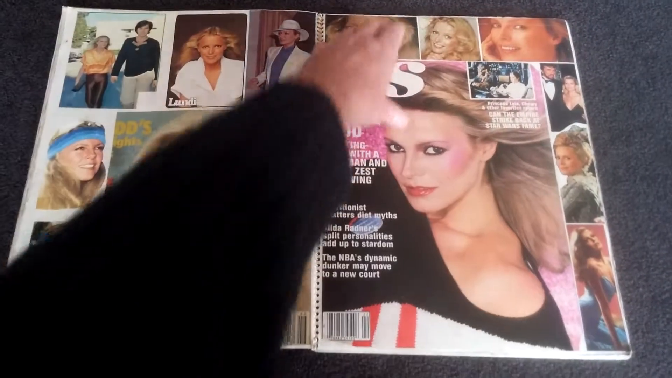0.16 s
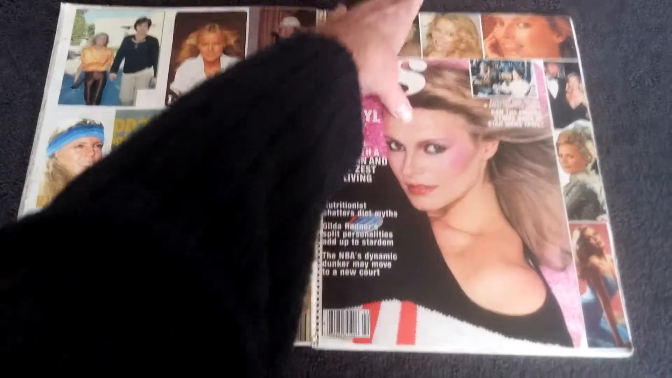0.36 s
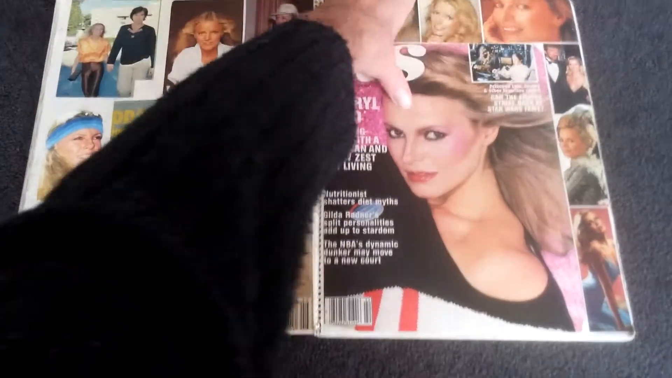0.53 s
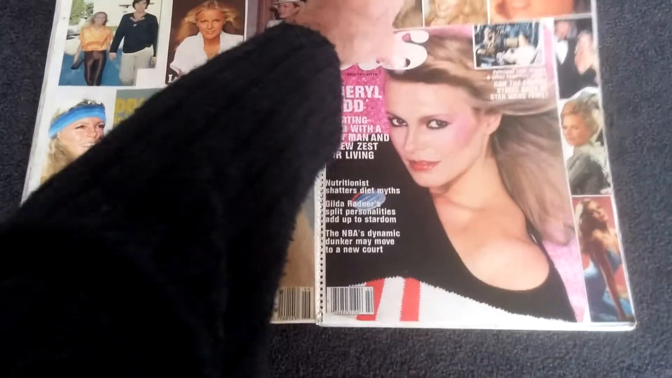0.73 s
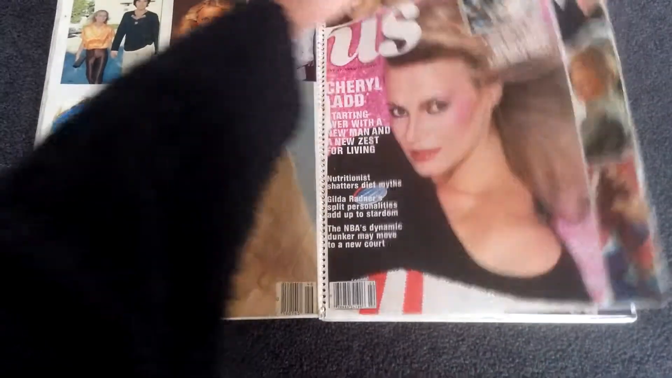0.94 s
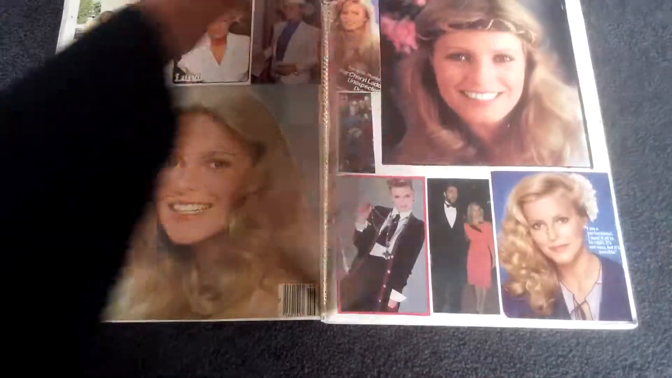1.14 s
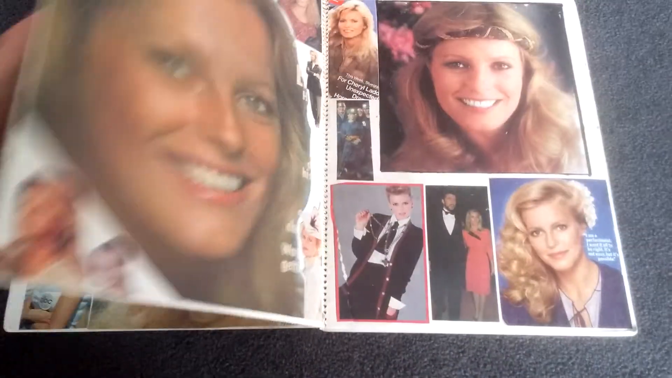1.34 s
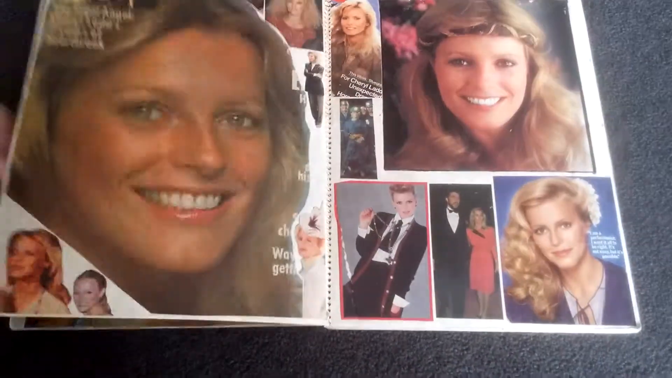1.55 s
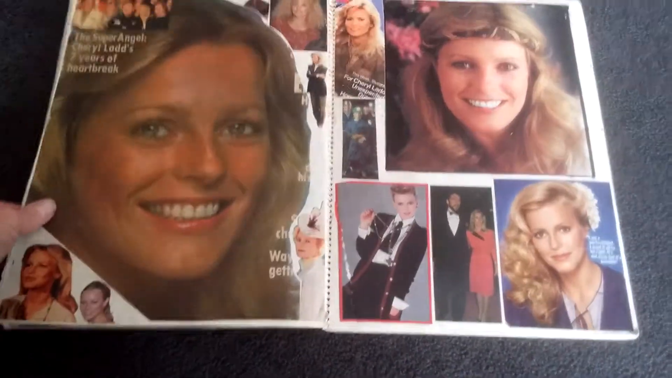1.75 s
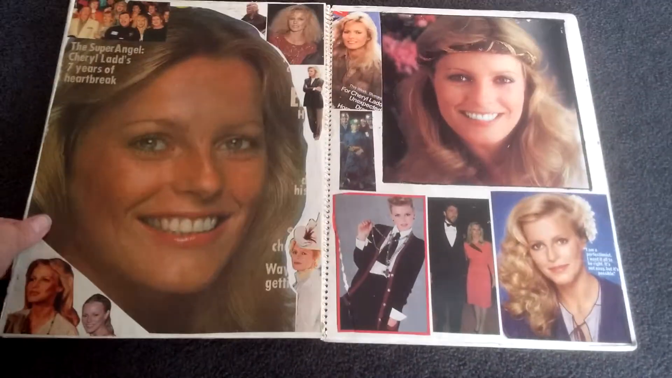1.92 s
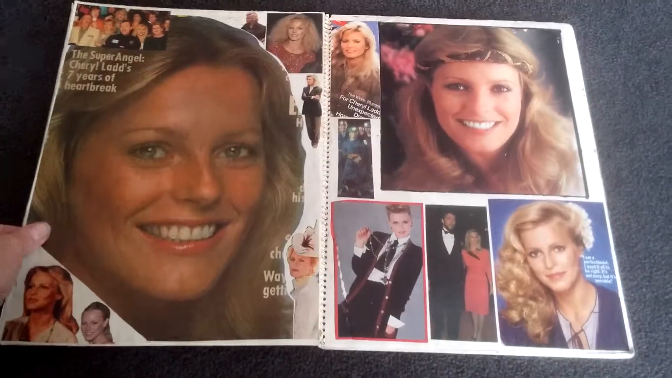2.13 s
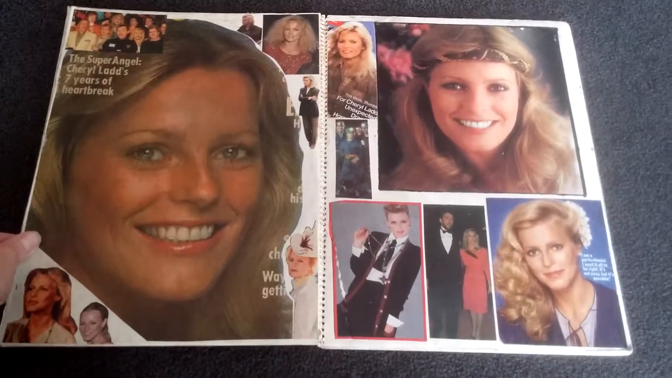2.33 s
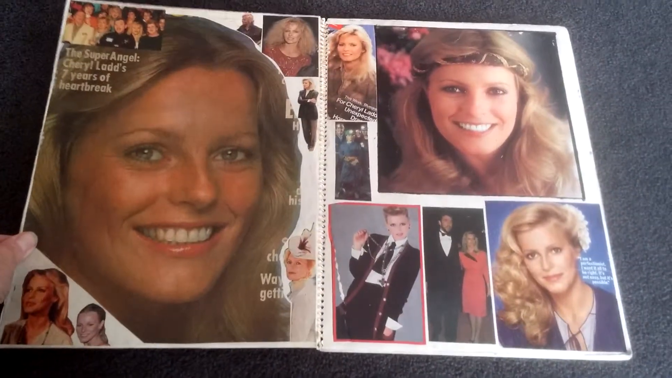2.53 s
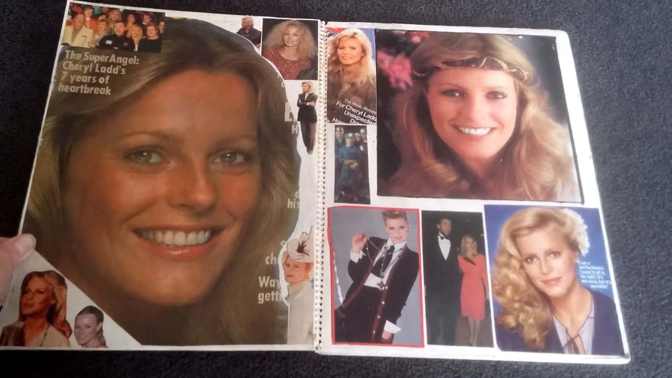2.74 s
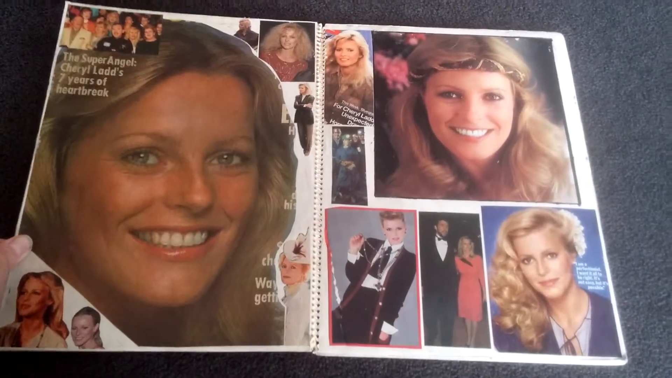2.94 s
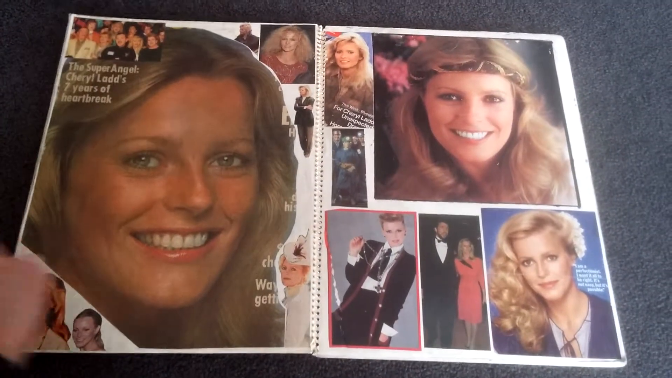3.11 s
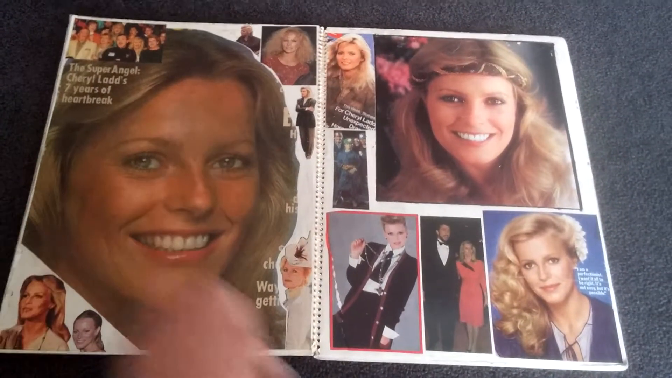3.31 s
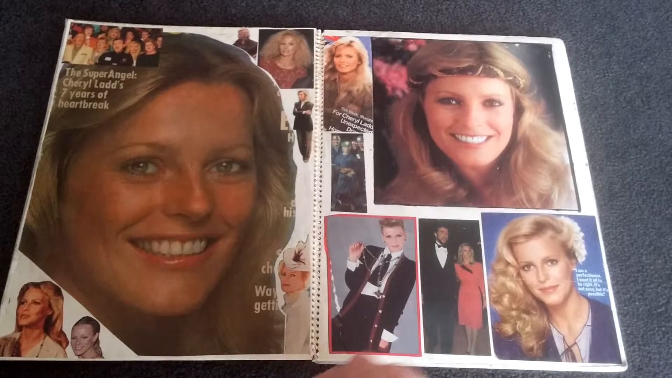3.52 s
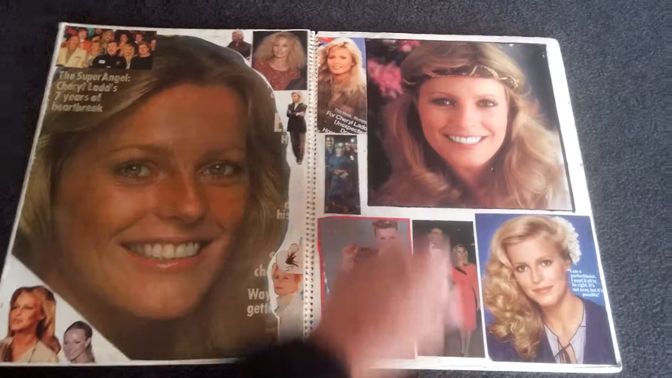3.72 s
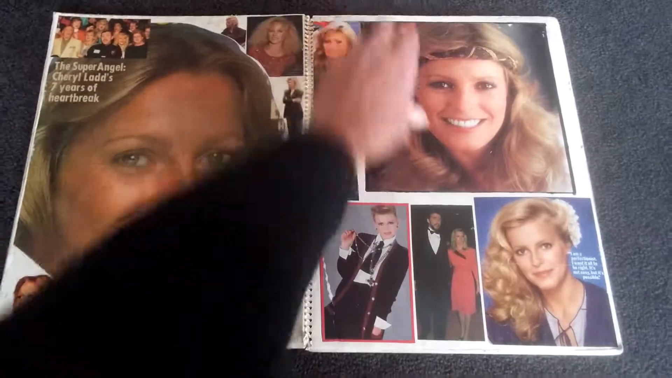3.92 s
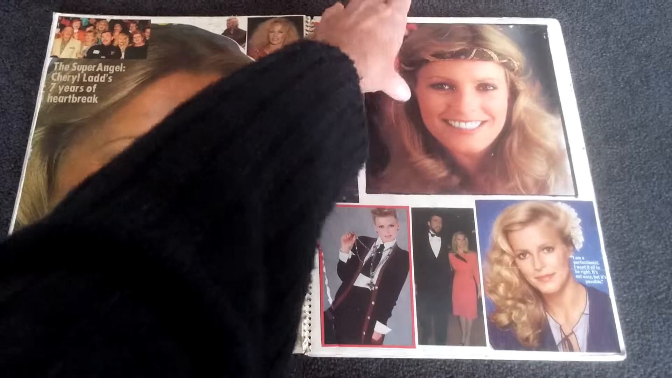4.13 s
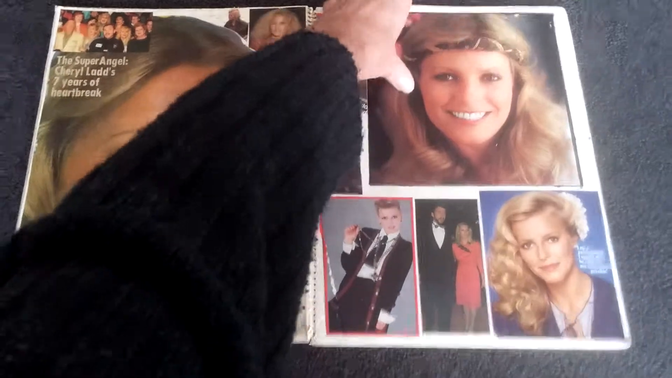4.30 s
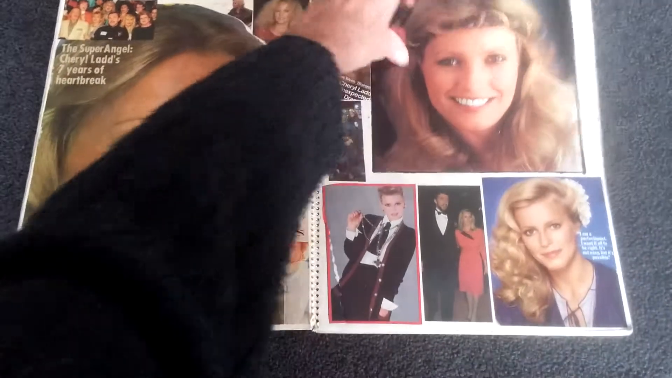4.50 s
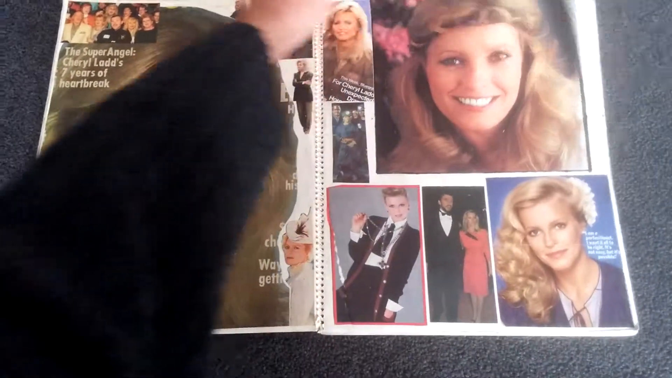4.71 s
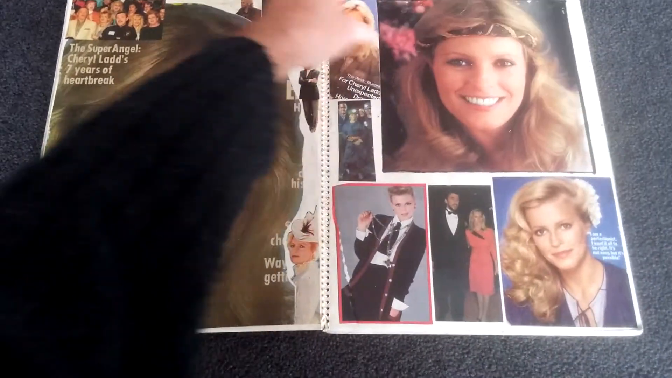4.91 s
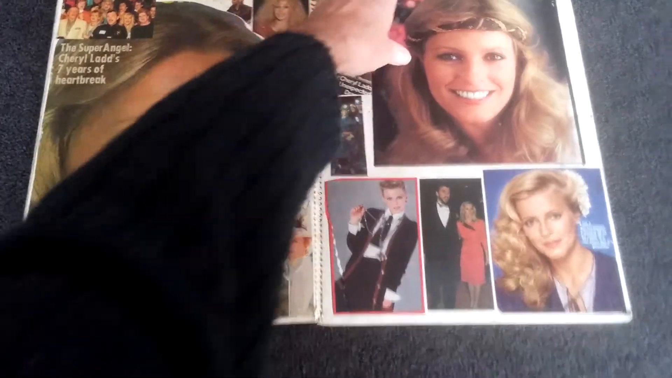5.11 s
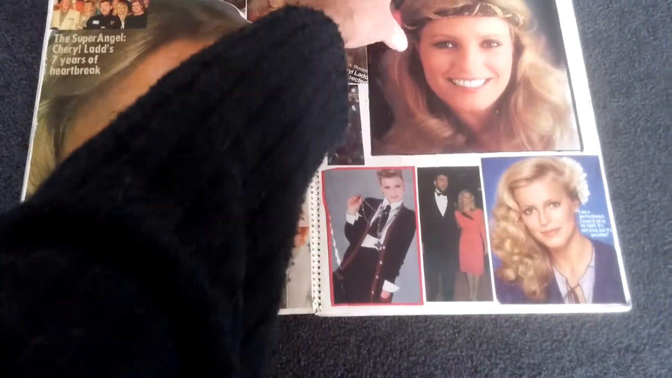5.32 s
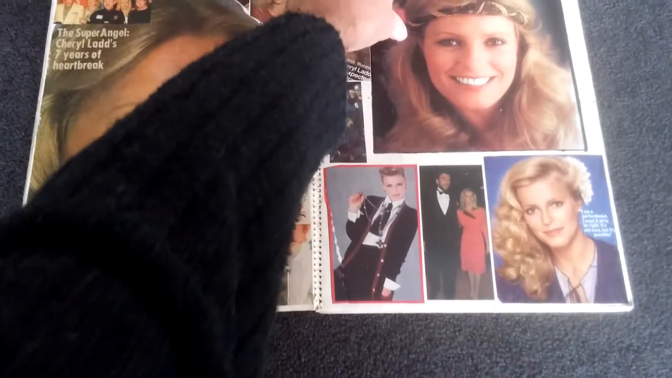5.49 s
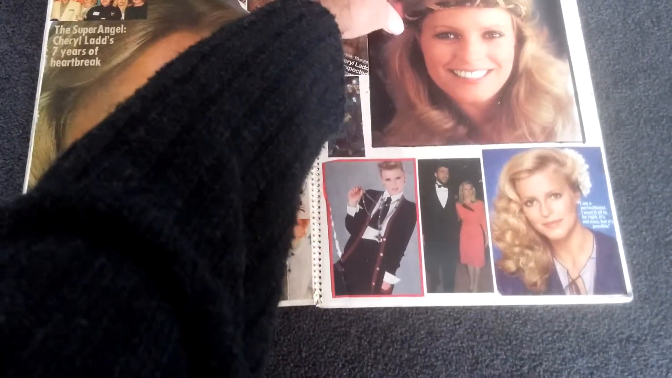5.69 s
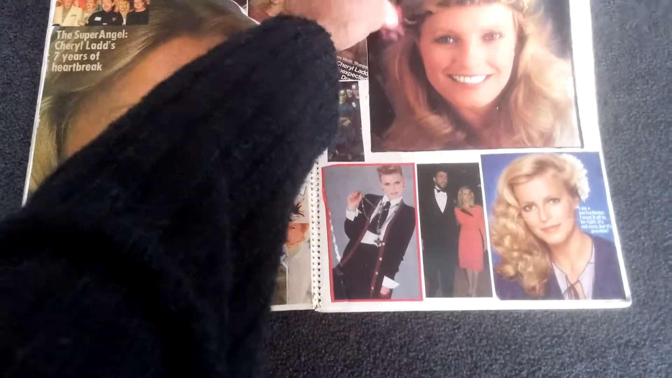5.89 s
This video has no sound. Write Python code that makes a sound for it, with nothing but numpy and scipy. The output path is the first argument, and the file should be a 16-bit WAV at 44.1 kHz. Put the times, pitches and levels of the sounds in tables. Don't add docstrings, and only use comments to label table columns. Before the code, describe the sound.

Close to a hand-held microphone in a small carpeted room, a hand turns a stiff pasted page. Faint finger rubs lead to crackling buckles and one very loud snap, then soft flaps, rustling and fine ticks as it settles. After near quiet, low handling thuds and sleeve brushing precede a brief rough scrape with a second, weaker snap. Small ticks and a light knock finish over steady hiss.

```python
import sys
import numpy as np
from scipy import signal
from scipy.fft import rfft, irfft
from scipy.io import wavfile
from scipy.ndimage import uniform_filter1d

SR = 44100
rng = np.random.default_rng(int(sys.argv[2]) if len(sys.argv) > 2 else 0)


def volts_from_decibels(level):
    exponent = np.asarray(level, float) / 20
    return 10 ** exponent


def transcribe(signal):
    frames = np.atleast_2d(signal).T
    limited = np.clip(frames, -1, 1)
    pcm = np.round(limited * 32767).astype(np.int16)
    wavfile.write(sys.argv[1], SR, pcm)


N = 262395

# hz, width_hz, level_db
SLOW_BENDING = [(816, 1300, 4.9), (1200, 600, 7.8)]
QUICK_BENDING = [(1880, 820, 12), (2190, 370, -7)]
FREE_EDGE = [(3300, 900, -3), (3990, 1080, 2.5), (5270, 1140, 1.5), (6660, 9200, -27)]
FIBRES = [(8950, 1700, -2.5), (10300, 2600, -3.5), (12000, 2000, -2), (13700, 1800, -9.5),
          (15500, 1600, -1)]
RIM_FIBRES = [(9550, 1500, 0), (8400, 620, -7)]


def unit(x):
    return x / np.sqrt(np.mean(x ** 2))


def unit_peak(x):
    return x / np.abs(x).max()


def highpass(x, hz):
    return signal.sosfilt(signal.butter(2, hz, "high", fs=SR, output="sos"), x)


def ring(x, hz, width_hz):
    return signal.lfilter(*signal.iirpeak(hz, hz / width_hz, fs=SR), x)


def body(x, modes):
    out = 0
    for hz, width_hz, db in modes:
        wide_hz = 1.39 * width_hz
        out = out + volts_from_decibels(db) * ring(ring(x, hz, wide_hz), hz, wide_hz)
    return out


def walk(rate_hz):
    hold = int(SR / rate_hz)
    levels = np.repeat(rng.standard_normal(N // hold + 1), hold)
    return 1.19 * uniform_filter1d(levels, hold)[:N]


def add(out, start_s, sound):
    i = int(start_s * SR)
    out[i:i + len(sound)] += sound[:N - i]


def damped(hz, t60_s, wobble, rise_s=0.00033, sag=0.):
    t = np.arange(len(wobble)) / SR
    pitch_hz = hz * (1 + sag * np.exp(-8 * t / t60_s))
    phase = np.cumsum(2 * np.pi * pitch_hz / SR + wobble)
    onset = 1 - np.exp(-(t / rise_s) ** 2)
    return unit_peak(np.sin(phase) * onset * np.exp(-np.log(1000) * t / t60_s))


def strokes(rows):
    step, rounding = 16, 1.5
    t = np.arange(0, N, step) / SR
    out = np.zeros((2, len(t)))
    for peak_s, rise_s, fall_s, db, bright_db in rows:
        before = (peak_s - t) / max(rise_s, .002)
        after = (t - peak_s) / max(fall_s, .002)
        away = np.where(t < peak_s, before, after)
        pair = volts_from_decibels(np.array([[0], [bright_db]]))
        out = np.maximum(out, volts_from_decibels(db - 20 * away ** rounding) * pair)
    return np.repeat(out, step, axis=1)[:, :N]


def hiss():
    # hz, level_db (per Hz)
    spectrum = [(26, -27), (45, -7), (53, -3.5), (90, -7), (265, 0), (693, -4), (804, -5.5), (1110, -6.5),
                (2150, -8), (4290, -12.5), (4970, -11), (8550, -22.5), (13000, -26.5), (15100, -21),
                (16200, -23)]
    level_db = -65.5
    hz, db = np.transpose(spectrum)
    f = np.maximum(np.fft.rfftfreq(N, 1 / SR), 1)
    shape = volts_from_decibels(np.interp(np.log(f), np.log(hz), db))
    noise = irfft(rfft(rng.standard_normal(N)) * shape, N)
    whine = volts_from_decibels(-100) * unit(ring(rng.standard_normal(N), 14700, 200))
    return volts_from_decibels(level_db + .5 * walk(6.5)) * unit(noise) + whine


def slide():
    # peak_s, rise_s (20 dB), fall_s (20 dB), slow_db, quick_re_slow_db
    bends = [(0.666, .03, .025, -68, -4), (0.81, .15, .08, -69, 3), (0.93, .2, .02, -65, -12),
             (0.985, .015, .04, -53, -8), (1.017, .006, .015, -49, -3), (1.04, .05, .2, -60, -1),
             (1.138, .01, .08, -56, -1), (1.165, .01, .045, -42, -3), (1.2, .05, .2, -53, -5),
             (1.25, .03, .07, -49, -6), (1.35, .3, .15, -58, -5), (1.508, .006, .05, -58, 0),
             (1.572, .002, .1, -53, -6), (1.61, .04, .35, -58, -3), (1.748, .002, .16, -53, -4),
             (1.95, .3, .2, -66, 2), (2.13, .04, .2, -71, 6), (2.33, .2, .2, -76, 14),
             (2.54, .3, .3, -70, 2), (2.653, .003, .03, -61, -5)]
    # peak_s, rise_s, fall_s, slow_db, quick_re_slow_db
    corner_bends = [(0.27, .15, .4, -79, -4), (2.89, .1, .1, -78, 9), (3.168, .1, .04, -80, 8),
                    (3.93, .3, .15, -74, 2), (4.26, .1, .1, -74, 4), (4.53, .02, .2, -66, 3),
                    (4.568, .06, .06, -63, 3), (4.67, .08, .2, -66, 5), (4.705, .05, .07, -52, 10),
                    (4.748, .01, .065, -45, 2), (5.403, .002, .12, -58, -3), (5.447, .015, .03, -66, 4),
                    (5.578, .015, .025, -69, -7), (5.87, .05, .03, -69, -3), (5.921, .005, .2, -54, -2)]
    # peak_s, rise_s, fall_s, edge_db, fibre_re_edge_db
    drags = [(0.98, .012, .03, -62, -14), (1.016, .01, .04, -70, -4), (1.124, .02, .04, -63, -25),
             (1.162, .008, .075, -46, -30), (1.168, .003, .005, -50, -8), (1.245, .015, .045, -51, -9),
             (1.386, .35, .15, -64, -2), (1.51, .015, .05, -65, -1), (1.573, .003, .5, -65, 2),
             (1.747, .006, .2, -62, 0), (1.78, .3, .04, -67, 1), (1.93, .04, .3, -73, 1),
             (2.06, .3, .04, -74, 5), (2.24, .02, .4, -71, -14), (2.33, .25, .05, -72, -2),
             (4.535, .02, .15, -67, -9), (4.59, .1, .02, -62, -9), (4.68, .02, .1, -56, -10),
             (4.706, .04, .05, -46, -6), (4.74, .003, .01, -38, -16), (4.755, .015, .08, -54, -14)]
    # peak_s, rise_s, fall_s, edge_db, fibre_re_edge_db
    rubs = [(0.215, .01, .3, -80, 3), (0.275, .15, .15, -74, 4), (0.628, .015, .03, -69, -3),
            (0.669, .015, .012, -61, -4), (0.824, .04, .015, -69, -3), (2.4, .02, .1, -79, 4),
            (2.536, .005, .33, -76, 5), (2.653, .003, .03, -65, -6), (2.842, .004, .22, -74, 6),
            (2.917, .003, .03, -66, -2), (3.09, .03, .2, -71, -8), (3.163, .08, .02, -64, -8),
            (5.403, .002, .07, -60, 1), (5.447, .008, .02, -59, -1), (5.5, .08, .18, -77, 8),
            (5.578, .015, .02, -67, 2), (5.865, .04, .05, -70, -3)]
    # peak_s, rise_s, fall_s, rim_db, fibre_re_rim_db
    scrapes = [
        (4.666, -0.01, 0.15, -53, -18),
        (4.705, 0.0426, 0.0751, -40.5, -9),
        (4.73, 0.01, 0.0186, -36.5, -14),
        (4.7375, -0.0126, -0.0157, -22, -10),
        (4.755, 0.06, 0.0848, -58, -12),
        (3.163, -0.26, -0.13, -68, -6),
    ]
    # hz, width_hz, level_db
    rim = [(5500, 990, 6), (6200, 410, -15)]
    slips_per_s, spread_db, patchy_db = 6000, 1.6, 1.5
    wander_db, wander_per_s = 2.5, 14

    pressure_db = patchy_db * walk(110)
    hits = rng.random(N) < slips_per_s / SR
    sizes = hits * volts_from_decibels(spread_db * rng.exponential(size=N))
    slip_level = uniform_filter1d(sizes, size=24) + 0.12
    gains = np.vstack([strokes(bends + corner_bends), strokes(drags + rubs), strokes(scrapes)])
    gains = uniform_filter1d(gains, size=60)
    parts = (SLOW_BENDING, QUICK_BENDING, FREE_EDGE, FIBRES, rim, RIM_FIBRES)
    out = np.zeros(N)
    for gain, modes in zip(gains, parts):
        slips = slip_level * rng.standard_normal(N)
        flicker = volts_from_decibels(pressure_db + 0.82 * walk(24.92))
        sound = np.zeros(N)
        for mode in modes:
            drift_db = wander_db * walk(wander_per_s) * (mode[0] > 7000)
            signs = rng.choice([-1, 1], N)
            sound += volts_from_decibels(drift_db) * body(slips * signs, [mode])
        out += gain * unit(flicker * sound)
    return out


def brushes():
    # peak_s, rise_s (20 dB), fall_s (20 dB), low_db, upper_re_low_db
    wool_strokes = [(0.36, .3, .3, -70, -3), (1.17, .015, .07, -57, -3), (1.6, .25, .2, -65, -4),
                    (3.62, .15, .15, -71, -1), (3.84, .2, .15, -68, 0), (3.97, .08, .1, -67, 0),
                    (4.26, .1, .12, -70, 2), (4.41, .08, .08, -68, 0), (4.74, .04, .08, -61, -4),
                    (5.12, .2, .25, -70, -1), (5.41, .03, .05, -75, 2)]
    # hz, width_hz, level_db
    wool_low = [(290, 110, 0)]
    # hz, width_hz, level_db
    wool_upper = [(430, 150, 0)]
    grain = volts_from_decibels(2.5 * walk(40))
    out = np.zeros(N)
    for gain, modes in zip(strokes(wool_strokes), (wool_low, wool_upper)):
        out += gain * unit(body(grain * rng.standard_normal(N), modes))
    return out


def grip():
    # start_s, peak_db, pitch_hz
    jolts = [(0.483, -52, 79), (0.51, -60, 79.6), (0.62, -57, 57.3), (0.698, -67, 67.6), (1.302, -52, 136),
             (1.348, -49, 150), (1.488, -57, 140), (3.646, -48.5, 86), (3.709, -50, 77), (3.815, -51, 64),
             (3.885, -51, 97), (3.909, -48, 102), (3.95, -46, 60), (3.982, -43.5, 92.6), (4.019, -45, 83),
             (4.046, -49.5, 113), (4.293, -45.5, 106.5), (4.314, -40, 113), (4.383, -42, 79),
             (4.416, -47.5, 80), (4.458, -50.5, 88), (4.5, -52.5, 88), (4.528, -50.5, 56.7),
             (4.578, -57, 69), (5.105, -49.5, 85.2), (5.15, -52, 82.3), (5.188, -51, 68.5),
             (5.226, -61.5, 93), (5.25, -48, 91), (5.288, -52.5, 58.6)]
    out = np.zeros(N)
    for start_s, db, hz in jolts:
        wobble = 0.044 * rng.standard_normal(16384)
        add(out, start_s, volts_from_decibels(db + 0.6) * damped(hz, 0.14, wobble, rise_s=0.0053, sag=0.34))
    return highpass(out, 34)


def cracks():
    # start_s, peak_db, panel_hz, edge_re_peak_db
    buckles = [(0.912, -50, 1200, -20), (0.936, -45, 1390, -35), (0.972, -39, 1090, -34),
               (0.975, -35, 1540, -30), (0.977, -31, 994, -34), (0.98, -40, 1340, -30),
               (0.999, -42, 1200, -24), (1.012, -40, 1510, -26), (1.0152, -36, 1860, -20),
               (1.0203, -45, 1000, -20), (1.074, -56, 1230, -19), (1.1575, -28.5, 990, -25),
               (1.166, -43, 1480, -11), (1.1705, -29.5, 1150, -22), (1.176, -38, 1090, -20),
               (1.188, -39, 1000, -20), (1.191, -42, 1600, -14), (1.241, -45, 1510, -14),
               (1.244, -34.5, 1900, -8), (1.261, -40, 826, -28), (1.295, -44.5, 1850, -2),
               (1.37, -46, 1000, -19), (1.5702, -44, 1070, -20), (1.7467, -39.5, 1200, -14),
               (1.798, -56, 1963, -14), (4.484, -42, 900, -26), (4.488, -46, 1500, -20),
               (4.673, -46, 1320, -10), (4.686, -41, 2120, -8), (4.7003, -35, 1190, -5),
               (4.7061, -39, 1100, -10), (4.722, -29, 2520, -12), (4.742, -32, 1120, -20),
               (4.747, -33, 1200, -18), (4.717, -22, 1410, -18), (4.7376, -21.5, 1900, -30),
               (4.7395, -24.5, 2200, -25), (5.404, -43.5, 1390, -4), (5.422, -42.5, 1860, -13),
               (5.648, -52, 1200, -18), (5.709, -54.5, 750, -12), (5.921, -55, 2100, -19),
               (5.943, -55, 1810, -8), (5.93, -52, 1030, -18), (5.941, -41, 680, -20)]
    # start_s, panel_db, edge_db, fibre_db
    ticks = [(0.649, -70, -63, -44), (0.667, -54, -47, -51), (0.823, -46, -56, -50), (1.389, -44, -42, -34),
             (1.082, -75, -70, -55), (1.246, -55, -52, -48), (1.382, -70, -60, -40), (1.503, -70, -66, -41),
             (1.473, -55, -58, -42), (1.595, -49, -50, -41), (1.625, -57, -59, -41),
             (1.693, -63, -47.5, -56), (2.653, -43.5, -43.5, -35.5), (2.865, -76, -57, -47),
             (3.043, -82, -70, -54), (3.074, -80, -64, -51.5), (3.089, -80, -66, -51),
             (5.429, -74, -57, -33), (1.72, -70, -59, -41), (2.918, -52, -45, -35.5),
             (4.451, -58, -52, -69), (4.717, -60, -29, -30), (5.217, -58, -52, -67), (5.422, -63, -54, -41),
             (5.444, -49, -50, -30), (5.577, -58, -57, -51)]
    swings, buckle_fibre_db = 5.2, -1
    tick_hz, tick_t60_s = 1500, 0.0014

    events = []
    for start_s, db, hz, edge in buckles:
        events.append((start_s, db, hz, db + edge, db + edge + buckle_fibre_db, swings / hz))
    for start_s, db, edge_db, fibre_db in ticks:
        events.append((start_s, db, tick_hz, edge_db, fibre_db, tick_t60_s))

    out, t = np.zeros(N), np.arange(2048) / SR
    for start_s, db, hz, edge_db, fibre_db, t60_s in events:
        t60_s = max(t60_s, .001)
        chance = rng.standard_normal((4, len(t)))
        sound = volts_from_decibels(db) * damped(hz, t60_s, 0.133 * chance[0], rise_s=0.0012)
        shake = body(chance[1] * np.exp(-t / (.5 * t60_s)), SLOW_BENDING + QUICK_BENDING)
        edge = body(chance[2] * np.exp(-t / 0.00023), FREE_EDGE)
        tick = body(chance[3] * np.exp(-t / 0.00016), FIBRES)
        sound += volts_from_decibels(db - 8.0) * unit_peak(shake)
        sound += volts_from_decibels(edge_db + 0.5) * unit_peak(edge)
        sound += volts_from_decibels(fibre_db - 7.0) * unit_peak(tick)
        add(out, start_s, sound)
    return highpass(out, 500)


def chatters():
    # peak_s, rise_s (20 dB), fall_s (20 dB), level_db, pitch_hz
    rattles = [(3.16, .15, .03, -63, 2300), (3.155, .12, .035, -65, 5100), (3.155, .08, .03, -67, 3800),
               (3.155, .06, .025, -70, 10200), (4.567, .03, .04, -55, 1320), (4.559, .04, .05, -58, 1850),
               (4.53, .015, .03, -65, 1500), (4.703, .012, .02, -44, 1200), (4.7372, .003, .005, -33, 5600),
               (1.1545, .002, .01, -27, 1100), (1.156, .002, .02, -38, 3500), (0.668, .012, .008, -62, 8700),
               (0.65, .003, .004, -60, 8700), (1.265, .02, .04, -58, 4200), (4.72, .04, .07, -52, 3000),
               (4.79, .05, .06, -62, 5500), (1.245, .012, .006, -46, 1800), (1.263, .006, .012, -50, 850),
               (0.978, .008, .015, -46, 1100)]
    q = 6
    out = np.zeros(N)
    slips = volts_from_decibels(3.0 * walk(300)) * rng.standard_normal(N)
    for peak_s, rise_s, fall_s, db, hz in rattles:
        first = int((peak_s - .2) * SR)
        part = slice(first, first + SR // 2)
        gain = strokes([(peak_s, rise_s, fall_s, db, 0)])[0]
        out[part] += gain[part] * unit(body(slips[part], [(hz, hz / q, 0)]))
    return out


def flaps():
    # start_s, peak_db, pitch_hz, t60_s
    landings = [(0.775, -59, 196, 0.11), (0.975, -59, 165, 0.3), (1.153, -51, 465, 0.092),
                (1.187, -50, 446, 0.075), (1.249, -46, 240, 0.077), (1.287, -51.5, 277, 0.029),
                (1.331, -37.5, 399, 0.055), (1.377, -54.5, 199, 0.14), (1.506, -50, 177, 0.057),
                (1.583, -45.5, 224, 0.1), (1.621, -58, 179, 0.12), (1.772, -55, 230, 0.06),
                (4.481, -53, 450, 0.035), (4.712, -44.5, 177.5, 0.15), (4.737, -42.5, 343, 0.074),
                (5.356, -57.5, 207, 0.08), (5.649, -55.5, 180, 0.033), (5.919, -51.5, 473, 0.035),
                (5.939, -44.5, 364, 0.023)]
    # start_s, peak_db, pitch_hz, t60_s
    knocks = [
        (4.309, -46, 260, 0.064),
        (4.391, -44.5, 195, 0.072),
        (5.917, -40, 923, 0.032),
        (5.919, -41.5, 1200, 0.021),
        (5.93, -47, 1120, .025),
    ]
    out = np.zeros(N)
    for start_s, db, hz, t60_s in landings + knocks:
        wobble = 0.063 * rng.standard_normal(8192)
        add(out, start_s, volts_from_decibels(db) * damped(hz, max(t60_s, .01), wobble, rise_s=0.0031))
    return out


def snaps():
    # start_s, peak_db, edge_db, edge_hz, edge_t60_s
    creases = [
        (0.9645, -42.5, -60, 4300, .012),
        (1.0907, -43, -63.5, 4060, .015),
        (1.107, -24.5, -41.5, 4050, 0.029),
        (1.118, -29, -46, 4030, .02),
        (1.13, -39, -63, 4090, 0.014),
        (1.135, -44.5, -63, 4050, .015),
        (1.152, -5.3, -21, 4090, 0.022),
        (4.7366, -25, -31.5, 3990, 0.025),
        (4.735, -34, -30, 5500, 0.017),
    ]
    flip_hz = 1800
    out, t = np.zeros(N), np.arange(2048) / SR
    for start_s, db, edge_db, edge_hz, t60_s in creases:
        u = (np.pi * flip_hz * (t - .0015)) ** 2
        flip = -(1 - 2 * u) * np.exp(-.8 * u)
        bent_t = t - 1.36 * 0.00062 * np.exp(-t / 0.00058)
        onset = 1 - np.exp(-(t / 0.00052) ** 2)
        beating = 1 + .5 * np.cos(2 * np.pi * 240 * (t - .002))
        whip = np.sin(2 * np.pi * edge_hz * bent_t) * onset * volts_from_decibels(-60 * t / t60_s) * beating
        whip = np.roll(whip, shift=40)
        shaking = rng.standard_normal(len(t)) * np.exp(-t / 0.0028)
        rattle = body(shaking, SLOW_BENDING + QUICK_BENDING[1:])
        tick = body(rng.standard_normal(len(t)) * np.exp(-t / .0003), FREE_EDGE + RIM_FIBRES)
        add(out, start_s + .002, volts_from_decibels(db - 16.0) * unit_peak(rattle))
        add(out, start_s + 0.00079, volts_from_decibels(db - 23.5) * unit_peak(tick))
        add(out, start_s, volts_from_decibels(db) * flip + volts_from_decibels(edge_db + 1.0) * whip)
    return highpass(out, 500)


def pops():
    # start_s, peak_db, pitch_hz
    settling = [(1.2374, -44, 10800), (1.2428, -47, 9000), (1.3336, -55, 11200), (1.3461, -51, 15300),
                (1.382, -43, 12000), (1.3905, -51, 8050), (1.3891, -35, 11900), (1.4728, -52, 11900),
                (1.5023, -52, 11600), (1.5112, -53, 15200), (1.5711, -54, 10700), (1.5931, -47, 9610),
                (1.611, -48, 10100), (1.6935, -47, 10300), (1.7467, -48, 11000), (1.7766, -50, 10500),
                (1.9103, -60, 8630), (1.983, -50.5, 9190), (2.0131, -51, 12000), (2.1119, -56, 8900)]
    # start_s, peak_db, pitch_hz
    catching = [(5.4016, -49, 15500), (5.4016, -42, 11500), (5.4174, -47, 8910), (5.4264, -42, 8870),
                (5.4324, -47, 10500), (5.4445, -42, 8310), (5.8516, -61, 9320), (5.8604, -64, 9040),
                (5.8711, -66, 9540), (5.8711, -58, 9070)]
    out, t = np.zeros(N), np.arange(256) / SR
    for start_s, db, hz in settling + catching:
        burst = rng.standard_normal(len(t)) * np.exp(-t / .0004)
        click = body(burst, [(min(hz, 15000), 2700, 0)])
        add(out, start_s, volts_from_decibels(db - 3) * unit_peak(click))
    return out


def room(x):
    t60_s, treble_t60_s, echo_db = 0.15, 0.079, -17.5
    t = np.arange(SR // 2) / SR
    noise = rng.standard_normal(len(t))
    low = signal.lfilter(*signal.butter(1, 3000, fs=SR), noise)
    tail = low * volts_from_decibels(-60 * t / t60_s) + (noise - low) * volts_from_decibels(-60 * t / treble_t60_s)
    tail *= 1 - np.exp(-(t / 0.00041) ** 2)
    tail /= np.sqrt(np.sum(tail ** 2))
    return x + volts_from_decibels(echo_db) * signal.fftconvolve(x, tail)[:N]


def scene():
    paper = snaps() + cracks() + slide() + pops() + flaps()
    return (room(paper + brushes() + chatters()) + grip() + hiss())[None]


def band_limit(x):
    return signal.sosfilt(signal.butter(12, 16380, fs=SR, output="sos"), x)


def record(dry):
    low_hz, top_hz, offset = 40.8, 15770, -0.00034
    x = highpass(dry, low_hz)
    x = signal.sosfilt(signal.ellip(12, .3, 60, top_hz, fs=SR, output="sos"), x)
    return band_limit(x + offset)


dry = scene()
out = record(dry)
transcribe(out)
```